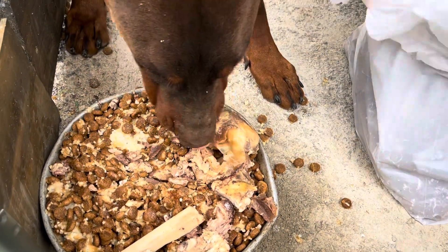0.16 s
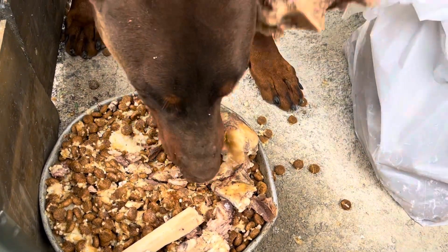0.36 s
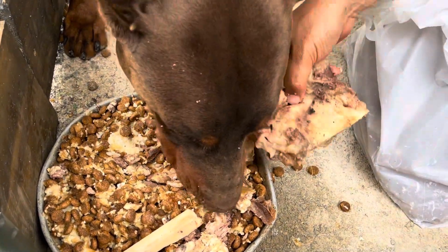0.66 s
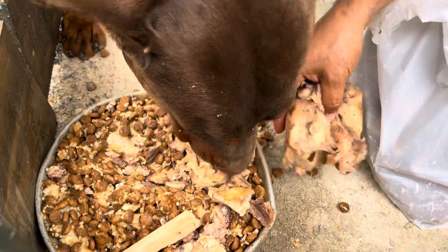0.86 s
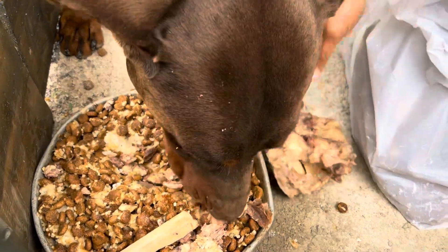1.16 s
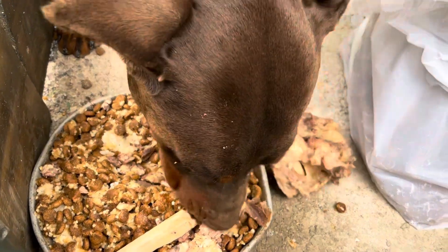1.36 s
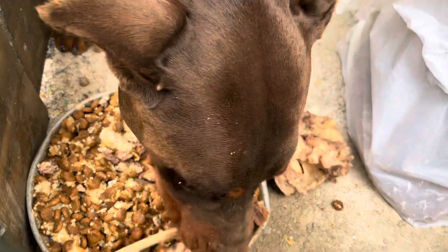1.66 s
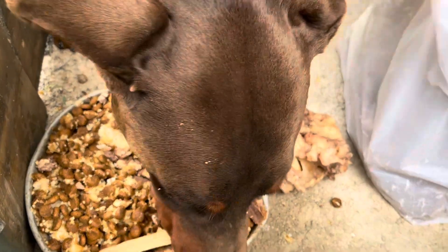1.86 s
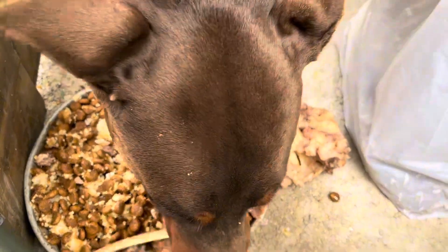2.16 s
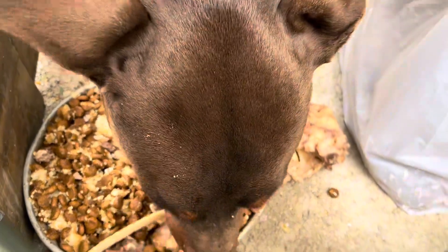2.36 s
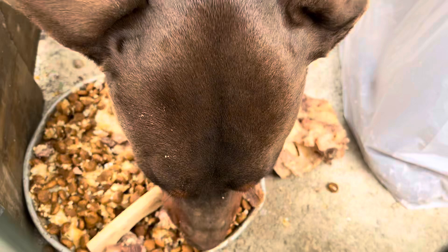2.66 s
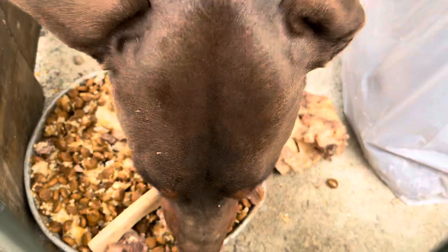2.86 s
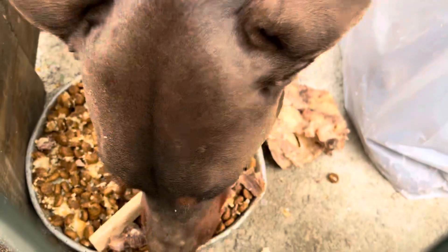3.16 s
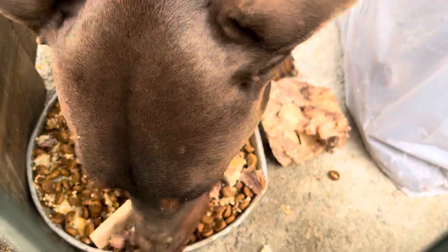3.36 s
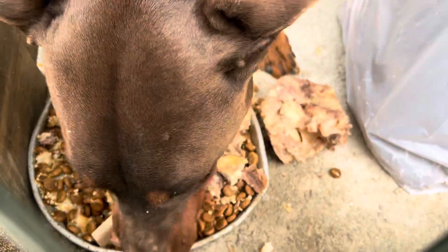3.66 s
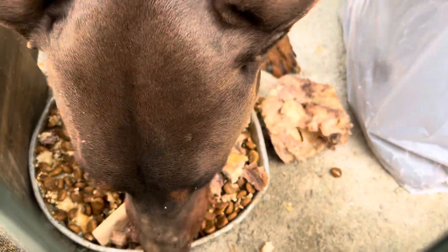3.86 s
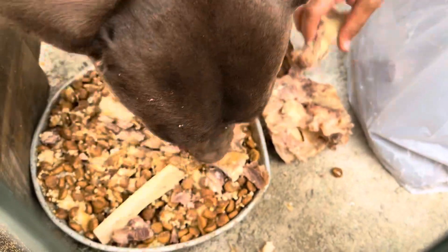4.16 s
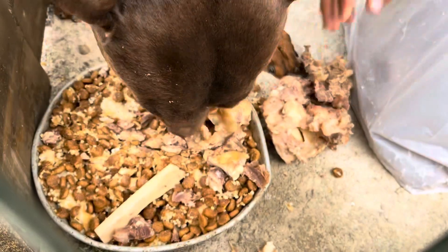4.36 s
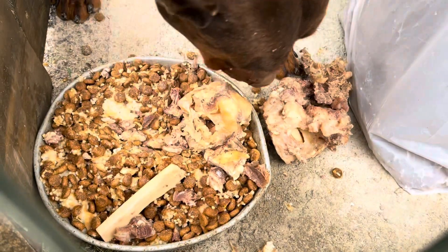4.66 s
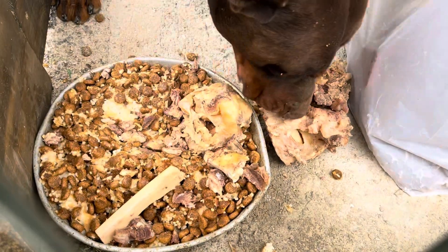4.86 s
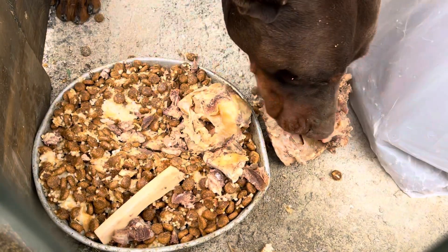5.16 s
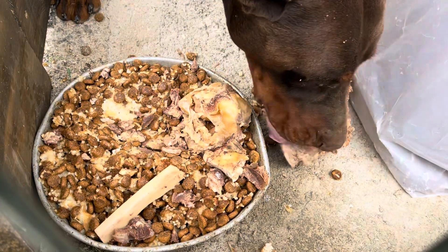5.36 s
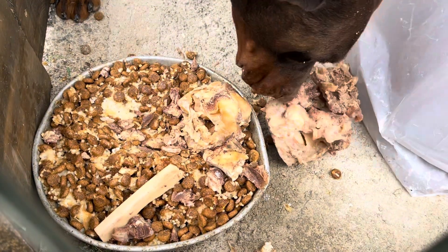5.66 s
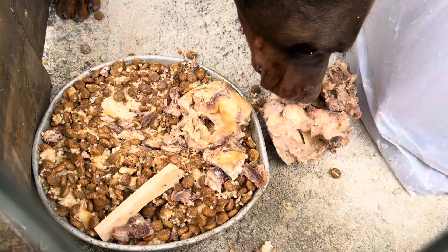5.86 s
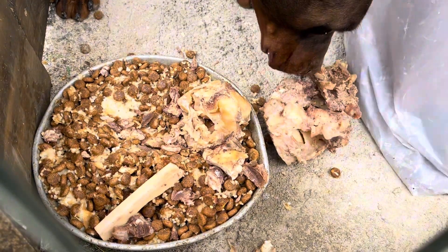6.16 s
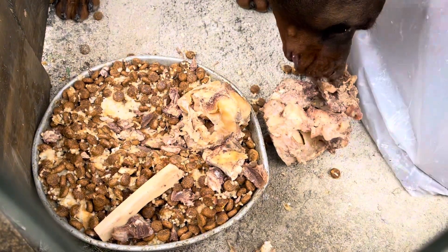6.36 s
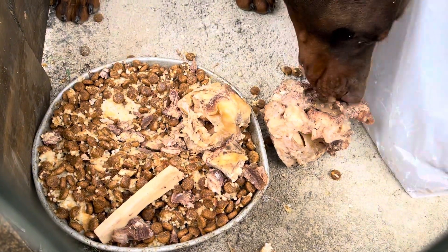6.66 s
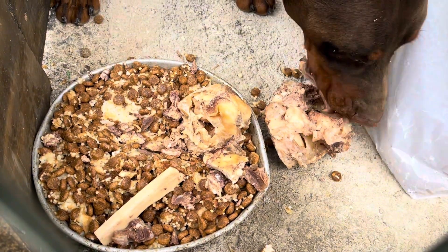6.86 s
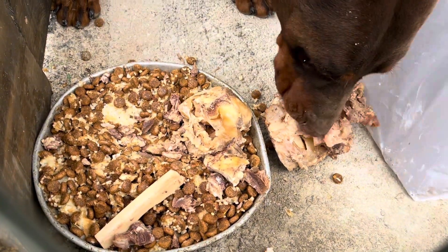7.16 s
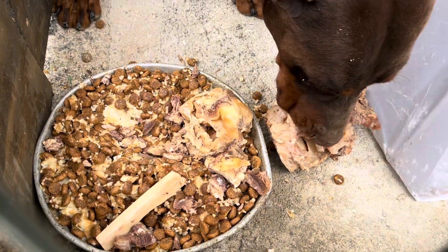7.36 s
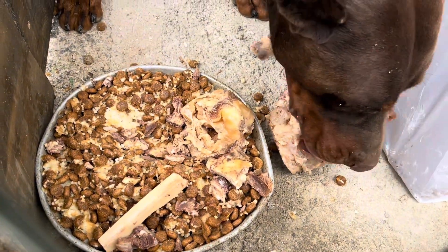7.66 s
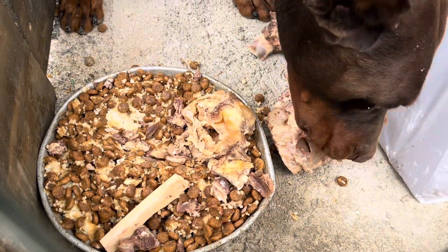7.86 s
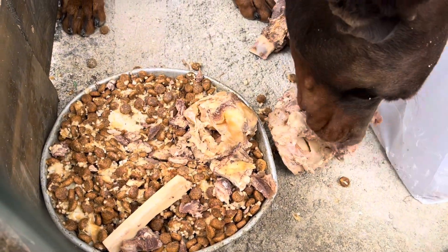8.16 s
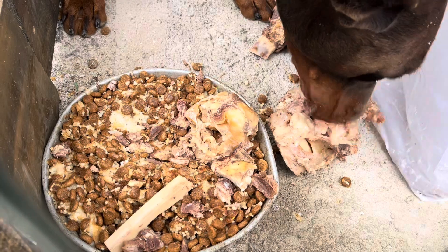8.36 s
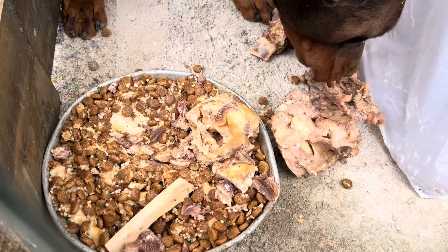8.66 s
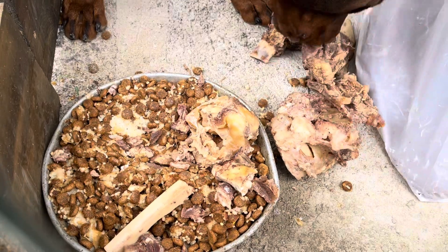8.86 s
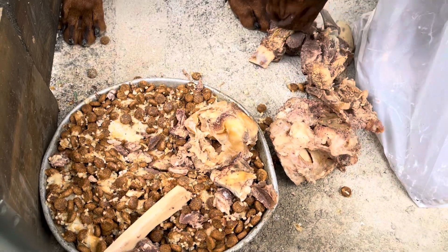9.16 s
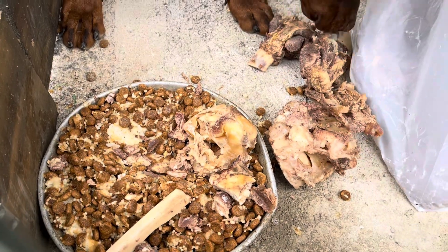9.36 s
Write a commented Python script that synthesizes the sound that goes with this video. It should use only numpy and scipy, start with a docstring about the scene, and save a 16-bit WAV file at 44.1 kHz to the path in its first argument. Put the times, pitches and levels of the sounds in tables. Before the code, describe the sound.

Close wet chewing, gritty kibble rummaging, soft thuds and sharp bone cracks from a feeding dog, with faint distant engine hum outdoors.

```python
"""A dog eats kibble, meat and bone from a bowl on concrete, close under a hand-held pair of microphones.
From the start its muzzle rummages and snuffles in crackly noise, jaws and food thud and wet lips tick.
Soon pieces slide on the floor as bands of friction; then bone cracks in snaps and short rings, hardest
near 4.2 s, and from 1.8 s on teeth or bone at times drag on the bowl and set its modes ringing.
Behind it all a far engine idles in low tones that come and go, over a low rumble and a fading road hiss."""
import sys
import numpy as np
from scipy import signal
from scipy.fft import rfft, irfft, next_fast_len
from scipy.io import wavfile
from scipy.ndimage import uniform_filter1d, map_coordinates

SR = 44100
rng = np.random.default_rng(int(sys.argv[2]) if len(sys.argv) > 2 else 0)


def transcribe(signal):
    """Save signal, clipped to [-1, 1], as a 16-bit WAV file at the path in sys.argv[1]."""
    frames = np.atleast_2d(signal).T
    limited = np.clip(frames, -1, 1)
    pcm = np.round(limited * 32767).astype(np.int16)
    wavfile.write(sys.argv[1], SR, pcm)


N = 418950  # length in samples, 9.5 s


def amp(db):
    """Turns decibels into a gain."""
    return 10 ** (np.asarray(db) / 20)


def unit(x):
    """Scales a sound to an average (rms) strength of 1."""
    return x / np.sqrt(np.mean(x ** 2) + 1e-20)


def table(rows, at):
    """Reads every column after the first at the given places, with straight lines between rows."""
    first, *columns = np.transpose(rows)
    return [np.interp(at, first, column) for column in columns]


def wobble(rate):
    """Draws a smooth random curve through `rate` random points a second."""
    points = rng.standard_normal(int(N * rate / SR) + 4)
    return map_coordinates(points, [np.arange(N) * rate / SR])


def filtered(x, response):
    """Multiplies the spectrum of x by a (complex) response of frequency."""
    size = next_fast_len(N + 8192)  # spare room so that the end does not wrap onto the start
    hz = np.fft.rfftfreq(size, 1 / SR)
    return irfft(rfft(x, size) * response(hz), size)[..., :N]


def colour(x, points):
    """Gives x a spectrum drawn through (frequency [Hz], level [dB]) points on a log axis, at rms 1."""
    point_hz, db = np.transpose(points)
    return unit(filtered(x, lambda hz: amp(np.interp(np.log(hz + 1), np.log(point_hz), db))))


def grit(rough_db, patchy_db, snaps, snap_db):
    """Makes two noises that share lumps, small snaps (so many a second) and patches of louder pitch."""
    lumps = amp(rough_db * (wobble(22) + 1.15 * wobble(70) + 0.57 * wobble(250)))
    sizes = (rng.random(N) < snaps / SR) * amp(snap_db + 10 * rng.random(N))
    fade = signal.lfilter([1], [1, -.98], sizes)  # each snap dies within a few milliseconds
    noise = rng.standard_normal((2, N)) * (lumps + fade)
    spectrogram = signal.stft(noise, nperseg=256)[2]
    # random patches, smoothed over pitch and then over time
    field = rng.standard_normal(spectrogram.shape[1:])
    field = uniform_filter1d(field, size=3, axis=0)
    field = uniform_filter1d(field, size=5, axis=1)
    return signal.istft(spectrogram * amp(patchy_db * unit(field)), nperseg=256)[1][:, :N]


def add(track, s, sound):
    """Mixes a sound into a track at s seconds."""
    spot = track[..., round(s * SR):][..., :sound.shape[-1]]
    spot += sound[..., :spot.shape[-1]]


def stereo_spread(pair):
    """Spreads a common and an unrelated part over left and right, by likeness, phase and balance."""
    # stereo spread by frequency:
    # (frequency [Hz], likeness [0-1], phase by which right leads [rad], left over right [dB])
    spread = [(120, .92, 0, .5), (350, .8, 0, .7), (690, .5, .7, 0), (1150, .6, 1.5, -2.5),
              (1550, .7, 2.3, -4.5), (1850, .6, .4, 0), (2250, .75, 0, 1.5), (2800, .7, -.3, 3.5),
              (3500, .4, -.7, 2), (5300, .2, .3, -.5), (7200, .6, 1.6, 0), (7800, .99, np.pi, 0),
              (9300, .99, np.pi, 0), (10500, .98, 2 * np.pi, 0), (13500, .98, 2 * np.pi, 0),
              (14500, .995, 3 * np.pi, 0), (16000, .998, 3 * np.pi, 0)]

    def parts(hz):
        alike, phase, db = table(spread, hz)
        turn = np.arccos(np.clip(alike, 0, 1)) / 2
        side = np.exp(np.outer([-1, 1], .5j * phase)) * amp(np.outer([.5, -.5], db))
        common = side * np.cos(turn)
        unrelated = side * np.sin(turn) * [[1], [-1]]
        return common, unrelated

    return filtered(pair[0], lambda hz: parts(hz)[0]) + filtered(pair[1], lambda hz: parts(hz)[1])


def yard():
    """Shapes noise into a nearly steady low rumble and a fading band of distant tyre hiss."""
    # spectrum of the outdoor rumble: (frequency [Hz], level [dB])
    rumble_shape = [(13, -60), (25, -26), (36, -16), (53, 3), (87, 1.5), (236, -4), (520, -13.5),
                    (900, -27.5), (1500, -20.5), (2100, -24), (4400, -83), (8000, -64), (13600, -69),
                    (16000, -45)]
    # spectrum of the tyre hiss: (frequency [Hz], level [dB])
    road_shape = [(450, -42), (750, 10), (950, 10), (1300, -51)]
    # course of the tyre hiss: (time [s], level [dB])
    road_course = [(0, -52), (1.5, -54), (3.5, -57.5), (9.5, -62)]
    rumble_gain = amp(-46 + 1.5 * wobble(2.94))
    rumble = rumble_gain * colour(rng.standard_normal((2, N)), rumble_shape)
    road_db, = table(road_course, np.arange(N) / SR)
    road_gain = amp(road_db + 0.66 * wobble(2.9))
    return rumble + road_gain * colour(rng.standard_normal((2, N)), road_shape)


def engine():
    """Adds low tones at multiples of one unsteady rate; uneven running lifts those beside the firing tone."""
    # weak tones: (multiple of the base rate [number], level [dB], share of uneven running [0-1])
    orders = [(3, -51.5, 0.74), (6, -51.5, 0.17), (7, -54, 0.37), (8, -52.5, 0.87), (12, -56.5, 0)]
    # course of the idle: (time [s], firing tone level before its trim [dB], uneven running [dB])
    idle = [(0.0, -70, -14), (0.4, -50.5, -2), (1.0, -53, -1), (1.5, -48, -2.5), (1.96, -49.5, 1),
            (3.23, -44, -5), (4.87, -46.5, -7.5), (5.32, -68, -14), (5.66, -46.5, -19), (6.06, -49, -8),
            (6.69, -75, -22), (7.1, -54, 3), (8.1, -47, 1), (8.49, -41, 6), (9.02, -48, -9.5),
            (9.5, -53, 5.5)]
    base_hz = 19.65  # half the shaft rate
    turn = 2 * np.pi * np.cumsum(base_hz * (1 + 0.003 * wobble(1.2))) / SR
    firing_db, uneven_db = table(idle, np.arange(N) / SR)
    firing_trim_db = 2.5
    out = amp(firing_db + firing_trim_db + 0.68 * wobble(5)) * np.sin(4 * turn)
    for order, db, share in orders:
        drift_db = 2 * wobble(0.806)  # each weak tone drifts on its own
        # order squared only sets a different starting phase for each tone
        out = out + amp(db + share * uneven_db + drift_db) * np.sin(round(order) * turn + order ** 2)
    return out


def scrapes():
    """Rubs meat and bone over the concrete: bands of rough noise with soft ends."""
    # slides: (start [s], end [s], level [dB], centre of the band [Hz])
    slides = [(0.388, 0.482, -47.5, 1500), (0.612, 0.697, -55, 1680), (6.78, 6.897, -57.5, 2310),
              (8.468, 8.677, -49, 2180), (8.85, 9.194, -52.5, 2180)]
    width = 0.29  # of each of two equal filters in a row, as a share of the centre
    t, out = np.arange(N) / SR, 0
    rub = rng.standard_normal((2, N)) * amp(2.3 * wobble(60))
    for start, end, db, centre in slides:
        def band(hz):
            return (1j * hz / (centre ** 2 - hz ** 2 + 1j * hz * centre * width)) ** 2

        contact = uniform_filter1d(1. * ((t > start) & (t < end)), size=900)  # ends last about 20 ms
        out = out + amp(db) * contact * unit(filtered(rub, band))
    return out


def drags():
    """Drives the food-damped modes of the bowl with rough friction while teeth or bone touch it."""
    # modes of the bowl: (frequency [Hz], width [Hz], level [dB])
    bowl = [(530, 530, -14), (964, 260, 3), (1117, 47, 0), (1240, 68, 5), (1564, 32, 10), (1810, 61, -15)]
    # contacts: (start [s], end [s], level [dB])
    contacts = [(1.773, 1.82, -37), (1.861, 1.879, -26), (1.885, 1.906, -24), (2.573, 2.591, -35),
                (3.966, 3.98, -39), (4.769, 4.78, -43), (4.927, 4.97, -45), (7.07, 7.09, -41)]
    t = np.arange(N) / SR
    contact = sum(amp(db) * ((t > start) & (t < end)) for start, end, db in contacts)
    rub = rng.standard_normal((2, N)) * amp(4.2 * wobble(300))

    def modes(hz):
        total = 0
        for k, (centre, width, db) in enumerate(bowl):
            damping = 1j * hz * width
            total = total + (-1) ** k * amp(db) * damping / (centre ** 2 - hz ** 2 + damping)
        return total

    return filtered(contact * rub / np.std(filtered(rub, modes)), modes)


def ticks():
    """Ticks of wet lips and crumbs: bursts of bright noise that die within milliseconds."""
    # ticks: (time [s], level before the trim [dB])
    lips = [(0.069, -22), (0.3431, -27), (0.5297, -34), (0.631, -36), (0.716, -32), (0.824, -30),
            (1.078, -28.5), (1.1686, -30), (1.5065, -31), (1.5395, -25), (1.699, -24), (2.765, -31),
            (2.788, -35), (3.379, -36), (3.966, -40), (4.2145, -29), (4.818, -26), (4.831, -28),
            (4.845, -35), (4.8708, -27), (4.97, -40), (5.023, -24), (5.0795, -27), (5.597, -32.5),
            (5.664, -36), (5.847, -32), (6.46, -14), (6.571, -19), (6.6538, -30), (6.683, -20.5),
            (6.821, -32.5), (7.0687, -22.5), (7.7184, -32.5), (8.3744, -27), (8.565, -24), (8.5987, -20),
            (9.18, -34)]
    trim_db = -9.0
    out, t = np.zeros((2, N)), np.arange(SR // 50) / SR
    for s, db in lips:
        bright = np.diff(rng.standard_normal((2, len(t) + 1)))  # differences favour the treble
        add(out, s, amp(db + trim_db - 60 * t / 0.02) * bright)  # falls 60 dB in 20 ms
    return stereo_spread(out)


def thuds():
    """Thuds of jaws, tongue and dropped food: short tones that swell fast, sag in pitch and fade."""
    # thuds: (time of the peak [s], level [dB], pitch [Hz], width [cycles])
    contacts = [(0.071, -31, 420, 2.8), (0.105, -26, 330, 1.2), (0.156, -24, 174, 2.2),
                (0.4218, -20, 187, 1.3), (0.881, -39, 226, 2), (0.9445, -28, 450, 1.4),
                (0.9552, -15, 590, 2), (0.9592, -22, 340, 1), (0.9635, -29, 180, 1.2),
                (0.969, -34, 700, 1.5), (1.168, -30, 132.5, 1.3), (1.815, -25.5, 204, 1.3),
                (2.1753, -20, 470, 1.04), (2.279, -29.5, 149, 2), (2.5772, -23, 513, 3.2),
                (2.6531, -23, 402, 0.77), (2.8237, -35, 495, 1.8), (2.906, -23.5, 640, 1.3),
                (2.9085, -28, 330, 0.98), (2.918, -30, 660, 2.3), (2.929, -28, 895, 2),
                (3.404, -28, 450, 0.88), (3.874, -28, 161, 0.8), (4.218, -28.5, 349, 1.4),
                (4.5782, -23.5, 350, 0.67), (4.778, -30, 769, 3), (4.952, -30, 349, 1.0),
                (5.443, -16.5, 380, 1.8), (5.51, -36, 220, 2.2), (6.064, -23.5, 617, 2),
                (6.068, -27.5, 190, 1.54), (6.08, -29.5, 76, 2.4), (6.3582, -33, 349, 1.9),
                (7.5804, -29, 511, 1.2), (7.6047, -25.5, 527, 0.6), (8.2638, -31, 240, 1.9),
                (8.8853, -28.5, 325, 1.2), (9.429, -33.5, 448, 1.3)]
    out, t = np.zeros(N), np.arange(-SR // 50, SR // 20) / SR
    for s, db, hz, cycles in contacts:
        u = t * hz / max(cycles, .5)  # time counted in widths
        shape = np.where(u < 0, np.exp(-8 * u ** 2), 1 / np.cosh(2.67 * u))
        sagging = hz * t * (1 - 0.042 * np.tanh(u))
        add(out, s + t[0], amp(db) * shape * np.cos(2 * np.pi * sagging + rng.normal(0, 0.63)))
    return out


def cracks():
    """Breaks bone and kibble: a bright snap, a brief ring of the piece's modes, weak splintering noise."""
    # breaks: (time [s], level before the trims [dB], main pitch [Hz], time to fall 60 dB [s],
    # snap over that level [dB])
    breaks = [(0.7718, -27.5, 880, 0.039, -2), (0.879, -34.5, 4200, 0.015, -13),
              (0.9531, -10.5, 900, 0.016, -11), (0.9742, -28, 2700, 0.015, -14),
              (0.976, -21, 1240, 0.017, -22), (1.0155, -25, 876, 0.018, -9.5),
              (1.1774, -30, 2420, 0.0076, -2), (1.192, -29.5, 2200, 0.0076, -3),
              (1.241, -37.5, 2570, 0.019, 5.5), (1.7817, -22, 2250, 0.017, -17),
              (1.7965, -22, 1055, 0.049, -8), (1.8657, -14.5, 1000, 0.021, -6),
              (1.8725, -16, 1040, 0.02, -17), (1.924, -28, 2290, 0.031, 2), (2.1498, -35, 2500, 0.0084, 8),
              (2.1724, -31, 2470, 0.01, -8), (2.31, -31.5, 1960, 0.014, -1),
              (2.5734, -15.5, 2480, 0.018, -9), (2.5742, -16.5, 1285, 0.024, -14),
              (2.5778, -22.5, 2925, 0.059, -14), (2.579, -29, 1827, 0.09, -20),
              (2.7896, -31, 3960, 0.015, -2), (2.9055, -25, 935, 0.03, -7), (2.9276, -30, 1980, 0.019, -6),
              (2.991, -31, 1680, 0.02, -8), (3.045, -27, 1890, 0.012, -4.5),
              (3.7041, -31.5, 1610, 0.071, -8), (3.8336, -19, 1300, 0.01, -5.5),
              (3.951, -29.5, 1280, 0.023, -27), (4.103, -33, 950, 0.034, -12), (4.175, -29, 4100, 0.02, 0),
              (4.206, -25, 1880, 0.046, -12), (4.2146, -5, 3580, 0.005, -28),
              (4.2146, -2.5, 2740, 0.011, -13), (4.2145, -11, 4450, 0.011, -18.5),
              (4.2143, -8.5, 2000, 0.011, -18), (4.2205, -21, 3540, 0.035, -18),
              (4.2222, -25.5, 2027, 0.07, -16), (4.871, -31, 2200, 0.022, 1), (5.133, -35, 2920, 0.038, 0),
              (5.079, -32, 3200, 0.014, 0), (5.513, -26, 2370, 0.014, -12), (6.062, -20, 890, 0.013, -4.5),
              (6.4613, -27.5, 2620, 0.018, -1), (6.5713, -20, 2630, 0.01, -4),
              (6.572, -22, 4760, 0.014, -7), (6.886, -34, 3250, 0.012, -9.5), (7.0702, -36, 3510, 0.11, 0),
              (7.1363, -26.5, 1050, 0.018, 2.5), (7.667, -22.5, 1610, 0.0087, -11),
              (7.776, -40, 3300, 0.015, 0), (7.7981, -34, 3900, 0.015, 3), (7.821, -42, 2900, 0.03, -14),
              (7.8705, -29, 3240, 0.017, -4.5), (7.872, -28.5, 1580, 0.028, -19),
              (8.2598, -25, 3600, 0.012, -6), (8.376, -34, 4450, 0.019, -11),
              (9.182, -31.5, 2490, 0.025, -3)]
    # modes of a breaking piece: (ratio to the main pitch [number], level [dB])
    piece = [(.45, -20), (.63, -7), (.74, -9), (1, 2), (1.23, -18), (1.45, -7.5), (1.75, -16)]
    # spectrum of the snap: (frequency [Hz], level [dB])
    snap_shape = [(800, -45), (1500, -1.5), (3000, -6), (5000, -10), (7500, -14.5), (16000, -25)]
    onset_cycles = 0.99  # a break swells over about one cycle of its pitch
    dull_hz = 5660  # modes above this hardly ring
    ring_trim_db, snap_trim_db = -4.5, -6.5
    out, snaps, t = np.zeros((2, N)), np.zeros(N), np.arange(SR // 10) / SR
    ratio, mode_db = np.transpose(piece)[..., None]
    bright = colour(rng.standard_normal((2, N)), snap_shape)
    quarter_turn = np.pi / 2 * np.arange(2)[:, None, None]  # sets the unrelated part apart
    for s, db, hz, t60, snap_db in breaks:
        chance = rng.standard_normal((2, 3, len(ratio), 1))
        mode_hz = hz * ratio * (1 + 0.01 * chance[0, 0])
        tone = np.sin(2 * np.pi * mode_hz * t + 0.8 * chance[:, 1] + quarter_turn)
        mode_gain = amp(mode_db + 1.1 * chance[:, 2]) / (1 + (hz * ratio / dull_hz) ** 10)
        ring = np.sum(mode_gain * tone, axis=1)
        # the splintering roughens the ring itself
        splintering = amp(-32.0 - 60 * t / 0.018) * rng.standard_normal((2, len(t)))
        fade = amp(-60 * t / max(t60, .003)) + splintering
        onset = 1 - np.exp(-(t * hz / onset_cycles) ** 2)
        add(out, s, amp(db + ring_trim_db) * ring * fade * onset)
        add(snaps, s, amp(db + snap_db + snap_trim_db - 60 * t / 0.027))
    return stereo_spread(out + snaps * bright)


def crumbs(per_s, centre_hz, cycles, rise):
    """Scatters short damped tones of random pitch, size and time, as two parts of unlike phase."""
    when, pitch, size, turn = rng.random((3200, 4)).T[..., None]
    hz = centre_hz * amp(18 * (pitch - .5))  # up to 2.8 times lower or higher
    k = np.arange(600)  # samples within a grain
    live = np.arange(len(hz))[:, None] < per_s * N / SR  # only as many grains as the rate asks for
    u = k * hz / SR  # time counted in cycles
    strength = amp(-2.6 * np.log(size + 0.059))  # few are loud
    grain = live * strength * np.exp(-2 * u / cycles) * (1 - np.exp(-12 * u / cycles))
    place = ((when * N).astype(int) + k).ravel()
    parts = []
    for lag in (0, 1):
        tone = np.sin(2 * np.pi * (u * (1 + rise * u / cycles) + lag * turn))
        parts.append(np.bincount(place, (grain * tone).ravel(), N)[:N])
    return unit(np.array(parts))


def muzzle():
    """Pushes and crushes food and snuffles: three gritty noises follow the shoves and steady mouthing."""
    # shoves into the food: (time of the peak [s], level [dB], rise [s], fall [s],
    # fizz over that level [dB], scuffle over that level [dB])
    shoves = [(0.11, -35, 0.12, 0.21, -5.5, -1.5), (0.772, -45, 0.076, 0.36, -10, -14),
              (0.96, -45, 0.053, 0.037, -24, 12), (1.08, -45, 0.052, 0.034, -16, -1),
              (1.181, -49, 0.018, 0.057, -4, -12), (1.545, -42.5, 0.0094, 0.19, -9, -16),
              (1.712, -37.5, 0.12, 0.031, -6.5, -2.5), (1.797, -29, 0.041, 0.076, -12.5, -3),
              (1.87, -33, 0.01, 0.068, -25, 2.5), (1.94, -31, 0.063, 0.023, -13, -8),
              (2.067, -43, 0.16, 0.046, -5.5, 4.5), (2.165, -43, 0.035, 0.17, -9, 4.5),
              (2.42, -41, 0.057, 0.06, -8, 3), (2.55, -45, 0.1, 0.051, -2, 4.5),
              (2.581, -38, 0.057, 0.087, -8, 0.5), (2.806, -42, 0.062, 0.13, -20, -0.5),
              (2.858, -37.5, 0.11, 0.054, -3.5, -15), (2.983, -44, 0.19, 0.073, -3.5, -2),
              (3.137, -47.5, 0.064, 0.041, -4, 6), (3.71, -40.5, 0.22, 0.053, -9, 2.5),
              (4.113, -45, 0.022, 0.21, -3, -3), (4.215, -36, 0.12, 0.07, -19, -6.5),
              (4.452, -48, 0.098, 0.26, -7, 1.5), (4.765, -35.5, 0.049, 0.13, -12.5, -2.5),
              (4.955, -33.5, 0.036, 0.043, -15, 0.5), (5.138, -43, 0.21, .08, -8.5, 3),
              (5.29, -38.5, 0.089, 0.095, -3, -17), (5.517, -45, 0.48, 0.059, -13, 2),
              (5.67, -43, 0.0063, 0.51, -5, -12), (5.731, -41.5, 0.054, 1, -8.5, 2),
              (6.04, -42, 0.028, 0.33, -2.5, -4), (6.174, -31, 0.044, 0.072, -6.5, -3),
              (6.352, -32.5, 0.049, 0.068, -9.5, -5.5), (6.481, -32, 0.045, 0.057, -6, -2.5),
              (6.583, -34, 0.078, 0.036, -9, -5.5), (6.697, -44, 0.14, 0.074, -14, -1),
              (7.004, -39, 0.0035, 0.21, -21, -2), (7.08, -32.5, 0.037, 0.052, -5, -2),
              (7.14, -33, 0.058, 0.048, -5, -1.5), (7.248, -46.5, 0.044, 0.021, -5, -2.5),
              (7.4, -40.5, 0.044, 0.13, -11.5, -3), (7.563, -48.5, 0.027, 0.26, -19, 8),
              (8.147, -41, 0.015, 0.34, -7.5, -13), (8.271, -37.5, 0.065, 0.067, -11, 0),
              (8.582, -33, 0.18, 0.11, -13, -4), (8.87, -43, 0.24, 1, -13, 1.5),
              (9.079, -41.5, 0.025, 0.041, -18, -1), (9.313, -46, 0.012, 0.16, -15, -6),
              (9.426, -34, 0.031, 0.035, -21, -1.5)]
    # mouthing between shoves: (time [s], level [dB], fizz over it [dB], scuffle over it [dB])
    mouthing = [(0, -63, -12, -5), (.34, -48, -29, 4.5), (.69, -54.5, -5, 8), (.9, -49.5, -14, 0),
                (1.15, -54, -21, 10), (1.26, -50.5, -7, 2.5), (1.45, -47.5, -11, -0.5),
                (2.7, -57, -11, 13.5), (3.3, -48, -11.5, 3), (3.37, -53.5, -15, 9), (3.45, -48, -22, 3),
                (3.65, -54, -6, -2), (3.79, -51.5, -14, 9), (3.93, -57.5, -21, 11), (3.98, -54, -14, 9),
                (4.35, -62, -24, 12.5), (5.55, -70, -18, -9), (6.7, -54, -9, 6), (6.9, -53.5, -14, 6),
                (6.96, -61, -18, 10), (7.32, -54, -24, 5), (7.81, -50, -8, 3), (7.98, -53.5, -32, 10),
                (8.1, -54, -4, 9.5), (9.5, -75, -27, 24)]
    # spectra of the three noises: (frequency [Hz], level [dB])
    crunch_shape = [(500, -6.5), (1000, -2), (1500, -3), (2600, -2.5), (3500, -5), (5000, -6.5),
                    (7000, -15.5), (9000, -17)]
    fizz_shape = [(3000, -12), (5500, -7.5), (8000, 3), (12000, -4), (15000, -13.5), (16000, -0.5)]
    scuffle_shape = [(90, -9.5), (200, 1), (400, -0.5), (800, -8.5), (1300, -9), (2500, -48)]
    swell_db = 10  # a shove lies this far under its peak one rise before and one fall after it
    swell_curve = 1.19  # over 1: round at the peak, steep at the ends

    t = np.arange(0, N + 64, 64) / SR  # the levels are worked out every 64 samples
    s, db, rise, fall, fizz_db, scuffle_db = np.transpose(shoves)[..., None]
    distance = np.where(t < s, (s - t) / np.abs(rise), (t - s) / np.abs(fall))
    shove_db = db - swell_db * distance ** swell_curve
    level_db, *over_db = table(mouthing, t)
    gains = []
    for shove_over, mouthing_over in zip((0, fizz_db, scuffle_db), (0, *over_db)):
        shove_power = np.sum(amp(shove_db + shove_over) ** 2, axis=0)
        mouthing_power = amp(level_db + mouthing_over) ** 2
        gains.append(np.interp(np.arange(N) / SR, t, np.sqrt(shove_power + mouthing_power)))

    crunch = amp(-3.5) * colour(grit(rough_db=1.63, patchy_db=2.5, snaps=40, snap_db=-3.0), crunch_shape)
    fizz = amp(1.0) * colour(grit(rough_db=2.0, patchy_db=5.5, snaps=80, snap_db=6.0), fizz_shape)
    scuffle = amp(-3.5) * colour(grit(rough_db=1.5, patchy_db=1.5, snaps=37, snap_db=-2.0), scuffle_shape)
    dry_crumbs = amp(-10) * crumbs(per_s=260, centre_hz=2960, cycles=2.04, rise=0)
    # wet pops ring longer and rise a little in pitch
    wet_pops = amp(-14) * crumbs(per_s=200, centre_hz=2818, cycles=27, rise=.03)
    return gains[0] * (crunch + dry_crumbs + wet_pops) + gains[1] * fizz + gains[2] * scuffle


def scene():
    """Mixes the dog near by with the yard behind; thuds and engine are equal on both sides."""
    wide = stereo_spread(yard() + scrapes() + drags() + muzzle())
    return wide + engine() + ticks() + thuds() + cracks()


def record(dry):
    """Keeps nothing at or above the band limit."""
    top_hz = 15950
    return filtered(dry, lambda hz: hz < top_hz)


dry = scene()
out = record(dry)
transcribe(out)
```